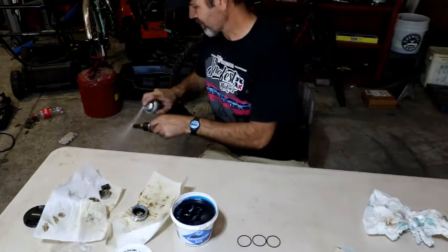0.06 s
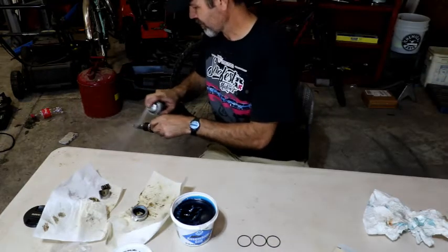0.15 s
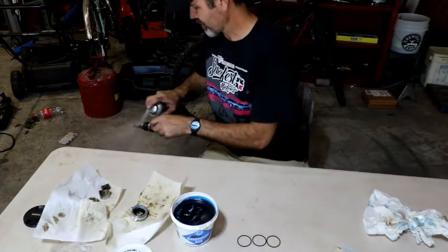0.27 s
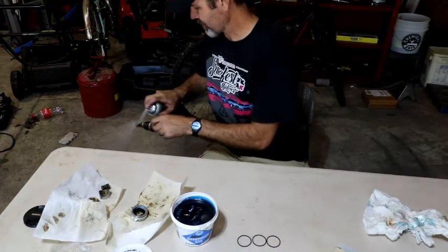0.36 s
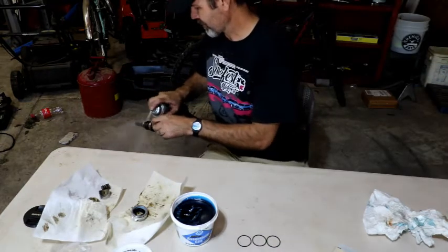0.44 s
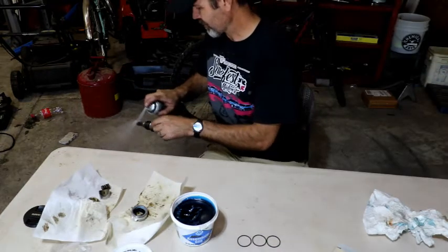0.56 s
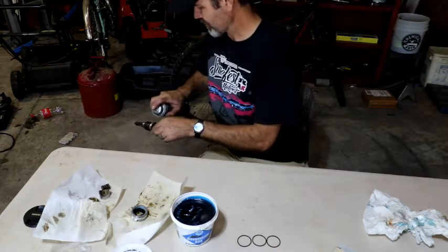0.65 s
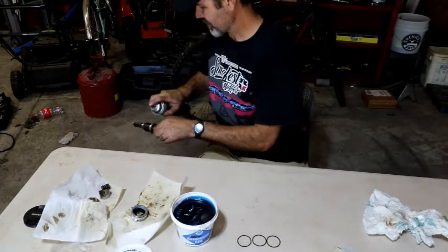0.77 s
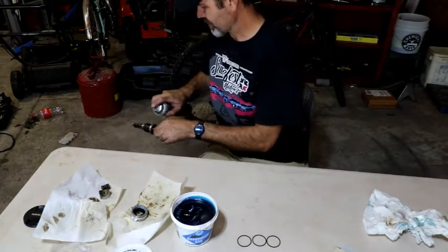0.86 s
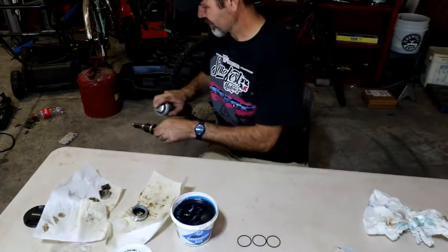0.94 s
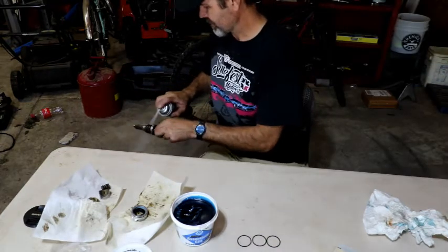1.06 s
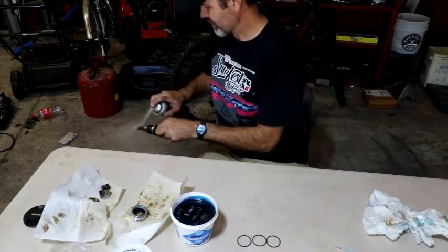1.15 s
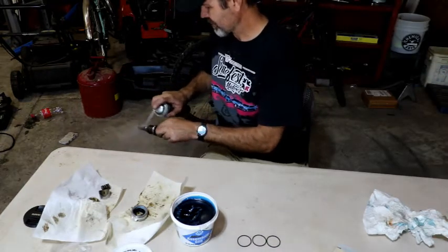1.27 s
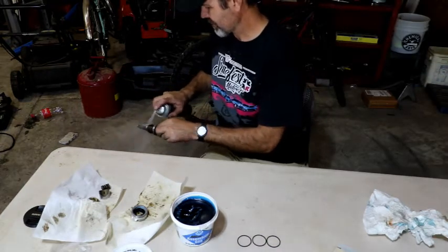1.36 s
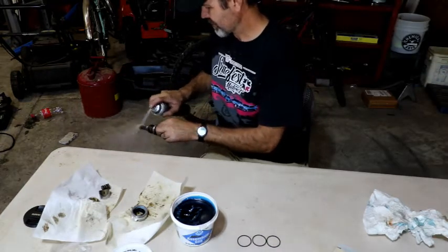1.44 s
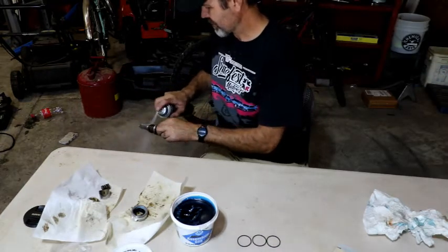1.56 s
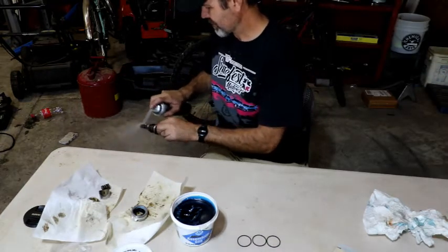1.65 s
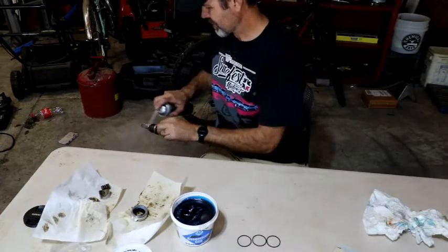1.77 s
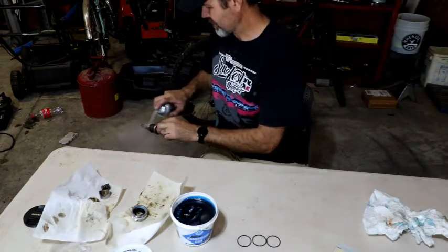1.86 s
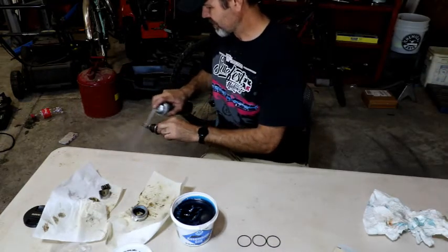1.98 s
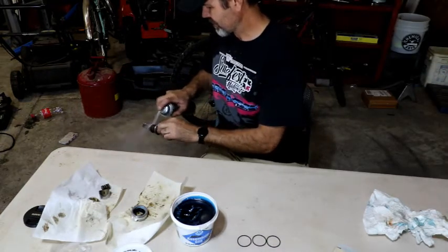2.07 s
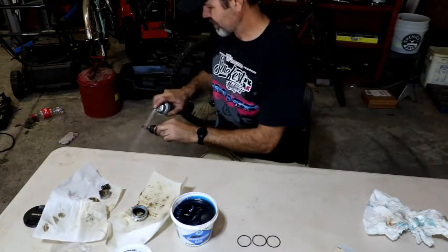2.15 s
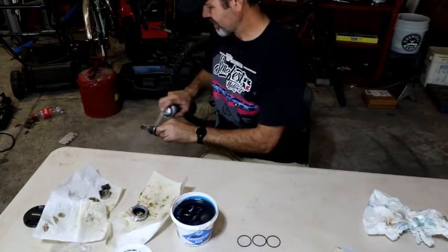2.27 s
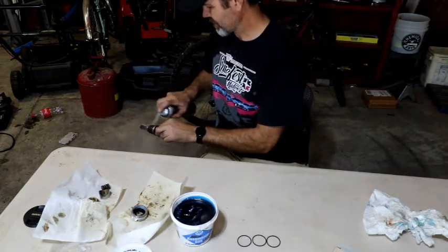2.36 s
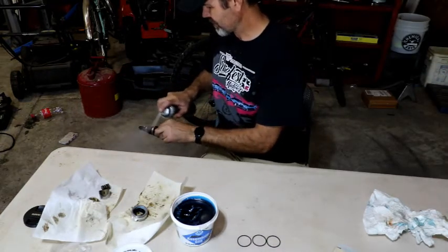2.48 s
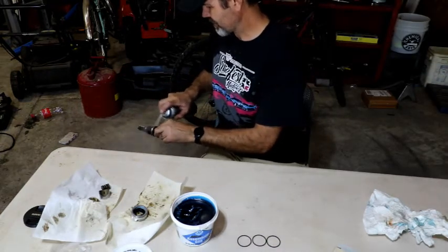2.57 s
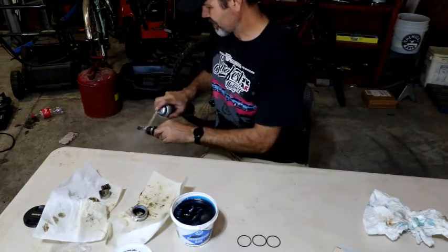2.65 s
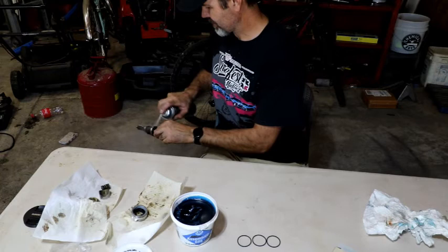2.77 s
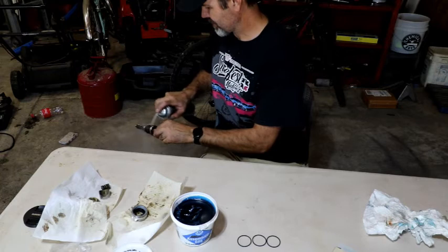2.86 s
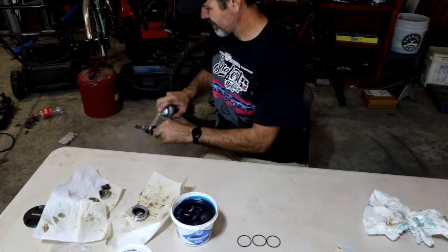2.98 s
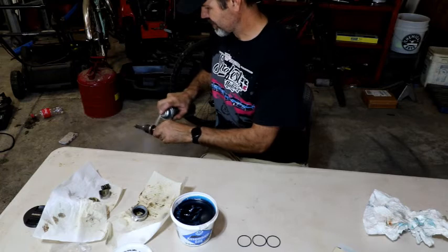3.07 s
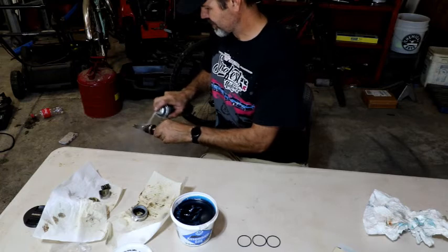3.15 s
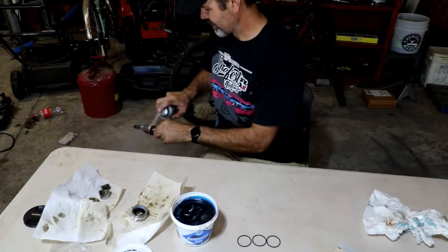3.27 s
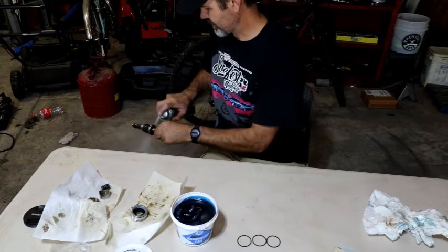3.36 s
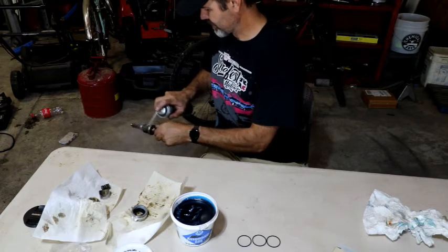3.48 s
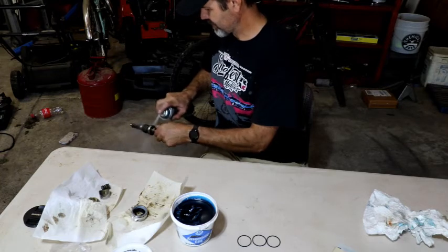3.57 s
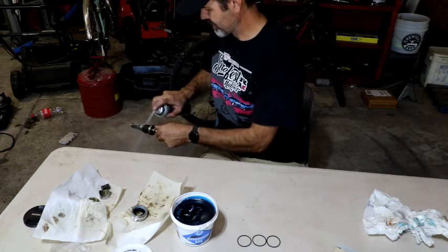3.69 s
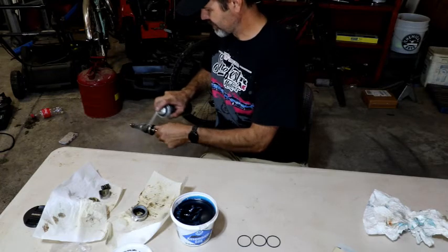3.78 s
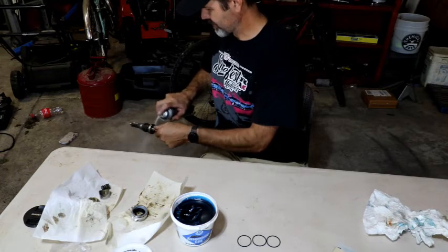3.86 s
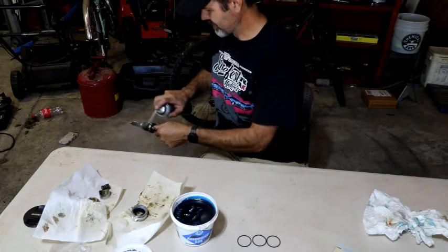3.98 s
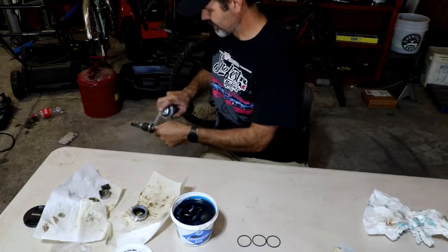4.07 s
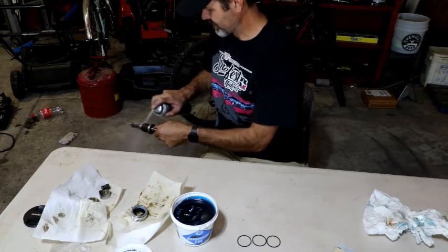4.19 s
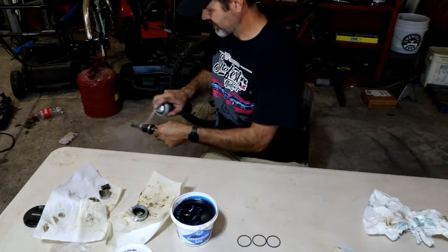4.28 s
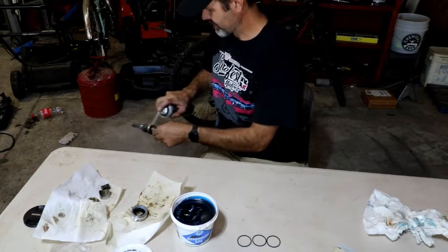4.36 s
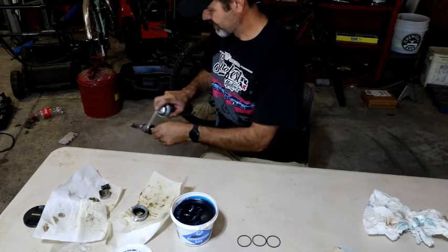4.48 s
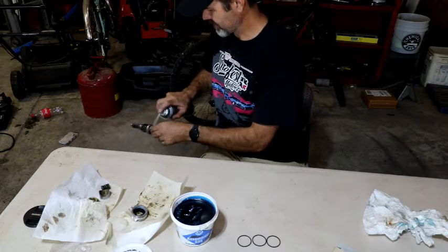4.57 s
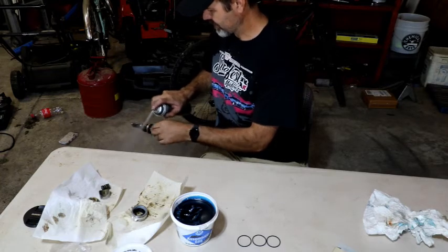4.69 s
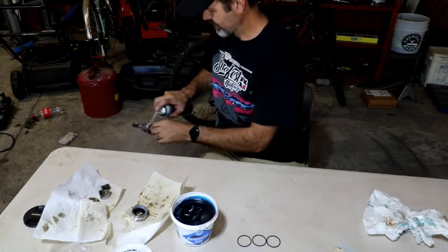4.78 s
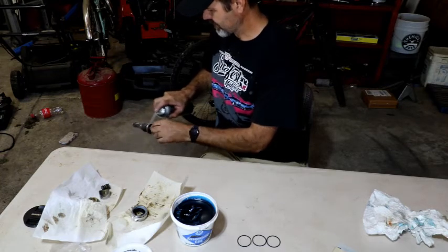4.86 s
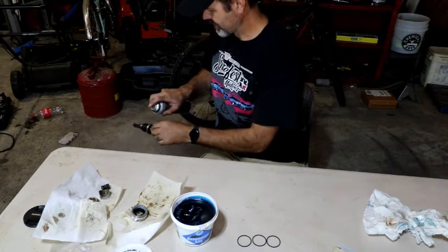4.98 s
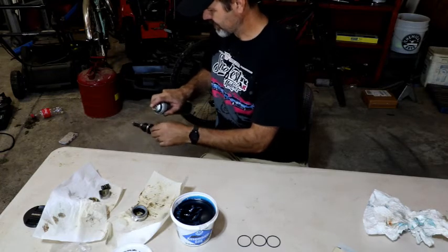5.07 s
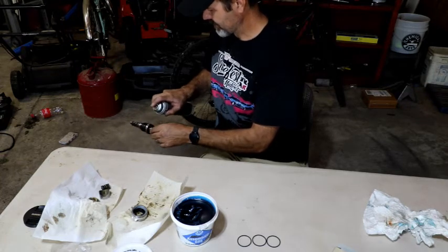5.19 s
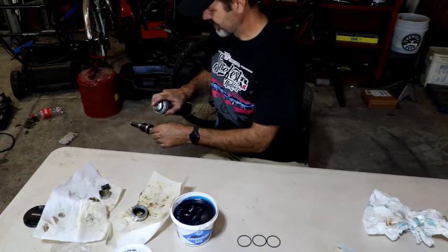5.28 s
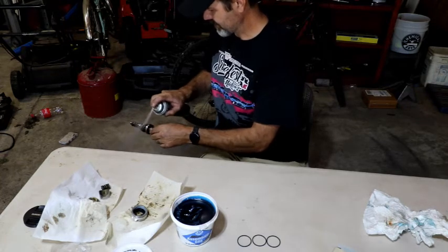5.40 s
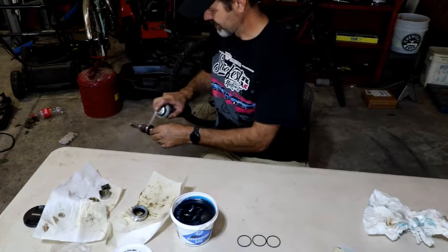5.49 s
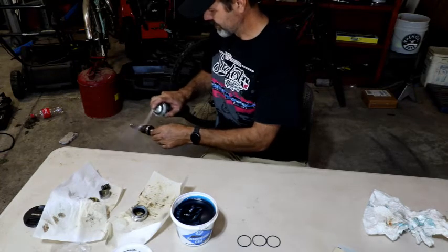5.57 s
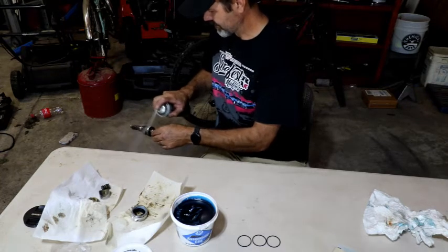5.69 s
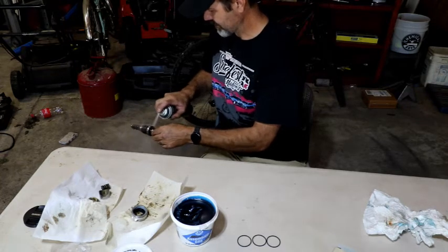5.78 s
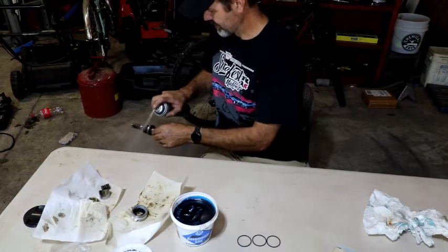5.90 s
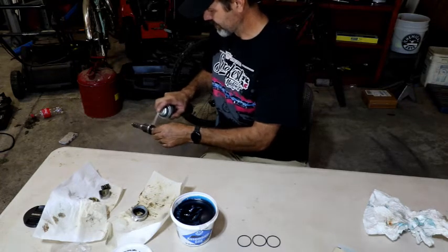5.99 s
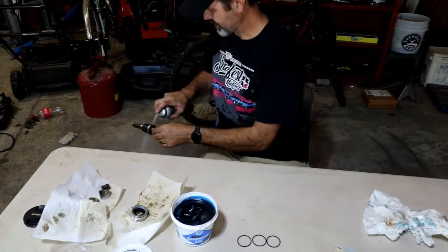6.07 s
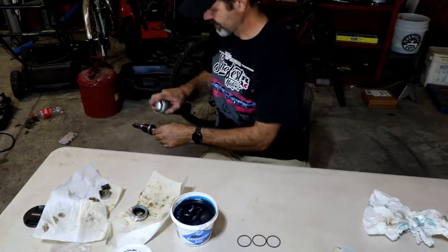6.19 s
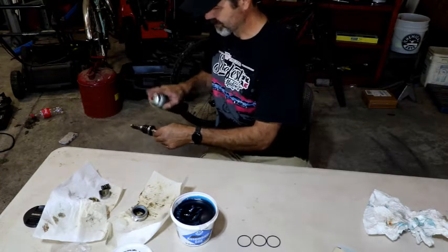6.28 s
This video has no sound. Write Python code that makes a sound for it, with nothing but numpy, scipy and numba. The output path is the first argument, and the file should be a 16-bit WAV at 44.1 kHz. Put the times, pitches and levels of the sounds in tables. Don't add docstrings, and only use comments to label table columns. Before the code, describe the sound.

An aerosol can sprays a hollow metal part about two metres from the microphone in a garage. The hiss is already running, stops sharply, returns for a long burst of about four seconds, pauses, then gives a short last burst. Bottle-like hollow whooshes and liquid gulps colour it, a drop fizzes in the second gap, and brief reverberation follows each stop over faint traffic rumble.

```python
import sys
import numpy as np
from scipy import signal
from scipy.fft import rfft, irfft
from scipy.io import wavfile
from scipy.ndimage import uniform_filter1d, map_coordinates
from numba import njit

SR = 44100
rng = np.random.default_rng(int(sys.argv[2]) if len(sys.argv) > 2 else 0)


def boost(x):
    u = np.asarray(x, float) / 20
    return 10 ** u


def file_out(sig):
    cols = np.atleast_2d(sig).T
    lim = np.clip(cols, -1, 1)
    pcm = np.round(lim * 32767).astype(np.int16)
    wavfile.write(sys.argv[1], SR, pcm)


N = 279546
T = np.arange(N) / SR
HZ = np.fft.rfftfreq(N, 1 / SR) + 1

# valve opens in [s], valve shuts in [s].
BURSTS = [
    (-.1, .7045),
    (1.093, 5.045),
    (5.452, 6.156),
]
# level on opening in [dB], on shutting in [dB].
SPITS = [
    (-24, -18.5),
    (-15, -22),
    (-15, -22),
]
OPEN_DB_PER_MS, SHUT_DB_PER_MS, SPIT_MS = 2, 2.5, 3.7
CRACK_MS = 11.6

# start in [s], aim from 0 at the flank to 1 at the open end,
# nozzle tube pitch in [Hz], finger pressure in [dB].
HAND = [(0, .3, 4400, 1), (.1, 0.21, 4310, 0.5), (.7, 0.094, 4270, -0.5), (1.1, .2, 4230, -0.5),
        (1.35, 0.061, 4230, 0), (1.7, .1, 4370, 0), (2.1, 0.15, 4410, 0), (2.45, 0.3, 4600, 0),
        (3.0, 0.26, 4600, -0.5), (3.35, 0.77, 4530, -0.5), (4.0, 1, 4460, 0), (4.6, 0.51, 4520, 0.5),
        (4.95, 0.67, 4460, 0), (5.05, .5, 4300, -1), (5.45, 0.99, 4450, 0), (5.8, .8, 4470, 0),
        (6.05, 0.9, 4550, 0), (6.16, .4, 4520, -1.5)]
# middle in [s], bore over jet in [dB], bore pitch in [Hz], length in [ms].
SWEEPS = [(.0, -6, 1700, 33), (.31, -6, 1230, 50), (.51, -2, 1580, 63), (.66, -3, 1390, 22),
          (1.40, -2.5, 1650, 40), (1.68, -8, 1150, 35), (1.89, -3, 1730, 49), (2.13, -3, 1660, 55),
          (2.41, -10, 1680, 35), (2.58, -4, 1600, 35), (2.78, -6, 1600, 69), (2.98, -1, 1500, 70),
          (3.25, 0.5, 1530, 35), (3.38, -4.5, 1570, 25), (3.55, -4, 1470, 40), (3.78, -1.5, 1400, 39),
          (4.15, 0, 1520, 37), (4.29, -0.5, 1360, 56), (4.62, 5.5, 1330, 36), (4.71, -1.5, 1380, 42),
          (4.9, -1, 1390, 66), (5.55, -5, 1220, 32), (5.65, 0.5, 1370, 32), (5.9, -7, 1420, 68),
          (6.07, -1, 1300, 16)]
SWEEP_DIP_DB, TREMOR_DB, TREMOR_RATE = 0, 0.57, 14
LIFT_MS = 70

# frequency in [Hz], density in [dB per Hz].
JET_COLOUR = [(1060, -10), (1900, -2.5), (2500, -4), (2950, -2), (3800, -3), (4460, -2), (5600, -2),
              (6200, -7.5), (7400, -3.5), (8650, -5), (10900, -6), (13600, -7.5), (14700, -17.5),
              (15800, -12)]
# frequency in [Hz], density in [dB per Hz].
SPLASH_COLOUR = [(90, -35), (200, -12.5), (320, -7), (530, -1), (900, -1), (1400, 0.5), (2200, -12.5),
                 (3200, -25), (6000, -80)]
# frequency in [Hz], density in [dB per Hz].
GAS_COLOUR = [(1500, -33), (3000, -12), (4600, -8), (6300, -15), (8700, 0), (10800, -2), (12800, 2),
              (14500, -15), (16000, -12)]
JET_DB, MIST_DB, SPLASH_DB, BORE_DB = -25, 1, -10.5, -11.5
AIM_MIST_DB, AIM_SPLASH_DB, AIM_BORE_DB = 0.2, -2.5, 2.5
MIST_FROM_HZ, BORE_WIDTH_HZ = 6680, 300

TUBE_WIDTHS_HZ = (470, 740)
TUBE_DB, AIM_TUBE_DB, TUBE_RATIO = (-5, -9), (-9, -2.5), 1.956

# middle in [s], pitch in [Hz], level in [dB], length in [ms].
GULPS = [(.41, 950, -35, 37), (1.35, 1020, -38, 57), (1.57, 720, -33.5, 28), (1.72, 1040, -32, 30),
         (1.81, 710, -36, 23), (2.07, 490, -39, 29), (2.07, 750, -34, 30), (2.30, 1510, -31, 17),
         (2.75, 483, -41, 29), (3.25, 1510, -31, 25), (3.40, 2300, -38, 25), (3.78, 1400, -30.5, 37),
         (3.93, 243, -40.5, 28), (4.15, 1560, -38, 30), (4.15, 2530, -34, 22), (4.29, 332, -46, 26),
         (4.87, 2400, -37, 25), (5.02, 606, -40.5, 20), (5.625, 1095, -35, 25), (5.725, 423, -35, 31),
         (5.745, 515, -32.5, 28), (5.99, 444, -36, 35), (5.99, 530, -37, 33)]
GULP_WIDTH_HZ, GULP_WIDTH_SHARE = 69, 0.047

# level in [dB], pitch in [Hz], attack in [ms],
# fade in [dB per s], rise in [Hz per s].
FIZZ = (-50, 6200, 2, 150, 7000)
FIZZ_S = 5.312
# start in [s], peak level in [dB].
POPS = [
    (1.080, -43),
    (5.228, -52),
    (5.249, -51),
    (5.313, -40),
    (5.396, -52),
]
# start in [s], pitch in [Hz], level in [dB], t60 in [s].
PART_RING = (6.152, 9300, -38, .22)

# frequency in [Hz], t60 in [s].
GARAGE_DECAY = [(200, 0.44), (500, 0.63), (1400, 0.41), (4000, 0.41), (9000, 0.35), (13500, 0.23),
                (16000, 0.24)]
TABLE_SHARE, GARAGE_DB = 0.14, -5.5
BEAMED_DB = -6

# frequency in [Hz], density in [dB per Hz].
RUMBLE_COLOUR = [(15, -31), (25, -8), (119, -1.5), (205, -5.5), (261, -8.5), (391, -13.5), (878, -15.5),
                 (1390, -21), (1720, -23), (4300, -27.5), (5790, -27), (8220, -27.5), (14000, -31),
                 (15700, -40)]
RUMBLE_DB = -52
# time in [s], level over the rumble in [dB].
TYRE_ROAR = [
    (0, -10),
    (1.0, -14),
    (4.2, -15),
    (5.3, -13),
    (6.34, -7),
]
# time in [s], low drone in [Hz], its level in [dB], high drone level in [dB].
ENGINE = [(0, 56.8, -66, -75), (1.3, 56.2, -67, -74), (2.0, 56.4, -60, -57), (2.4, 57, -68, -66),
          (3.05, 61, -66, -55.5), (3.4, 59.9, -63, -58), (3.9, 61, -70, -72), (4.5, 64.8, -57, -51),
          (4.9, 68, -52, -56), (5.3, 69.7, -51, -58), (5.7, 68.2, -55, -53), (5.85, 66, -58, -54),
          (5.95, 55, -58, -53), (6.34, 50, -64, -64)]
ENGINE_RATIO = 1.55

# frequency in [Hz], density in [dB per Hz].
HISS_COLOUR = [(40, 3), (300, 2.5), (1500, 0.5), (5000, 1.5), (12000, -1), (16000, -1.5)]
HISS_DB = -59.5
# middle in [s], low edge in [Hz], high edge in [Hz],
# level in [dB].
FLASHES = [(.395, 10300, 11900, -38), (1.118, 5700, 7000, -35), (1.118, 7600, 9100, -32),
           (1.975, 10300, 11900, -38), (2.275, 5200, 6400, -35), (2.762, 13100, 14600, -40),
           (4.668, 11000, 12500, -35), (6.012, 11000, 13200, -35), (6.083, 6200, 7700, -36)]


def level(x, db):
    return x * boost(db) / np.sqrt(np.mean(x ** 2))


def noise(colour):
    hz, db = np.transpose(colour)
    return rfft(rng.standard_normal(N)) * boost(np.interp(np.log(HZ), np.log(hz), db, left=-90))


def walk(rate):
    hold = int(SR / rate)
    steps = np.repeat(rng.standard_normal(N // hold + 1), hold)
    return 1.3 * uniform_filter1d(uniform_filter1d(steps, hold), hold)[:N]


def patchy(spectrum, edges_hz, own_db, rate):
    out = 0
    for k in range(len(edges_hz)):
        share = np.interp(HZ, edges_hz, np.arange(len(edges_hz)) == k)
        out = out + irfft(spectrum * share, N) * boost(own_db * walk(rate))
    return out


@njit
def svf(x, hz, width):
    y, band, low = np.empty(len(x)), 0., 0.
    for i in range(len(x)):
        g, k = np.tan(np.pi * hz[i] / SR), width / hz[i]
        v = (band + g * (x[i] - low)) / (1 + g * (g + k))
        band, low, y[i] = 2 * v - band, low + 2 * g * v, k * v
    return y


def resonance(air, hz, width):
    return svf(svf(air, hz, 2. * width), hz, 1. * width)


def bump(at, ms):
    return np.exp(-((T - at) * 1000 / ms) ** 2)


def spray():
    share, _, press_db = hand()
    swept, bore_hz = sweeps()
    shake = boost(SWEEP_DIP_DB * np.sqrt(swept) + TREMOR_DB * walk(TREMOR_RATE))
    hiss = noise(JET_COLOUR)
    fine = 1 / (1 + (MIST_FROM_HZ / HZ) ** 12)
    droplets = boost(0.57 * walk(400) + 0.35 * walk(40))
    flow, spit = valve()
    force = droplets * boost(JET_DB + press_db - 0.95) * flow
    gas = level(irfft(noise(GAS_COLOUR), N), 0) * boost(1.3 * walk(900))
    wide = (jet(hiss * (1 - fine)) * shake + mist(hiss * fine, share) + splash(share)) * force + gas * spit
    beamed = (tube() * shake + bore(share, swept, bore_hz)) * force
    return wide, beamed


def valve():
    flow, spit = 0, 0
    for (opens, shuts), (first_db, last_db) in zip(BURSTS, SPITS):
        early, late = 1000 * (opens - T), 1000 * (T - shuts)
        unseated = np.clip(CRACK_MS - early, 0, 1)
        opening_db = -OPEN_DB_PER_MS * np.clip(early, 0, 60)
        flow = flow + unseated * boost(opening_db - SHUT_DB_PER_MS * np.clip(late, 0, 60))
        fade = np.exp(-(np.clip(-early, 0, 99) / SPIT_MS / 2) ** 2)
        spit = spit + unseated * boost(first_db + opening_db) * fade
        spit = spit + boost(last_db) * np.exp(-((late + 2.5) / SPIT_MS) ** 2)
    return flow, spit


def hand():
    s, *controls = np.transpose(HAND)
    return [np.interp(T, s, c) for c in controls]


def sweeps():
    power = sum(boost(db) ** 2 * bump(at, ms) for at, db, _, ms in SWEEPS)
    s, _, hz, _ = np.transpose(SWEEPS)
    return power, np.interp(T, s, hz)


def spray_bands():
    return np.linspace(1500, 16000, num=40)


def jet(coarse):
    return level(patchy(coarse, spray_bands()[:17], 1.32, 18), -0.25)


def mist(fine, share):
    out = level(patchy(fine, spray_bands()[8:], 2.36, 18), -0.11)
    return out * boost(MIST_DB + AIM_MIST_DB * share + 0.29 * walk(TREMOR_RATE))


def splash(share):
    out = level(patchy(noise(SPLASH_COLOUR), np.geomspace(100, 3200, num=9), 0.97, 11), 3.02)
    return out * boost(SPLASH_DB + AIM_SPLASH_DB * share + 1.3 * walk(TREMOR_RATE))


def tube():
    share, first_hz, _ = hand()
    out = 0
    for ratio, db, turn_db, width in zip((1, TUBE_RATIO), TUBE_DB, AIM_TUBE_DB, TUBE_WIDTHS_HZ):
        hz = ratio * first_hz * (1 + 0.0078 * walk(12))
        ring = resonance(rng.standard_normal(N), hz, width)
        out = out + level(ring, 0) * boost(db + turn_db * share + 1.1 * walk(20.65))
    return out


def bore(share, swept, hz):
    lift = np.prod([np.clip(np.abs(T - shuts) * 1000 / LIFT_MS, 0, 1) for _, shuts in BURSTS], axis=0)
    steady = lift * boost(BORE_DB + AIM_BORE_DB * share)
    ring = resonance(rng.standard_normal(N), hz, BORE_WIDTH_HZ)
    return level(ring, -3.5) * np.sqrt(steady ** 2 + swept)


def gulps():
    air, out = rng.standard_normal(N), 0
    for at, hz, db, ms in GULPS:
        ring = resonance(air, np.full(N, 1. * hz), GULP_WIDTH_HZ + GULP_WIDTH_SHARE * hz)
        out = out + level(ring, db) * bump(at, ms)
    return out


def leftovers():
    db, start_hz, attack_ms, fade_db, rise_hz = FIZZ
    air = rng.standard_normal(N)
    hz = start_hz + rise_hz * np.clip(T - FIZZ_S, 0, .14)
    fizz = level(svf(svf(air, hz, 2300.), hz, 1500.), 0)
    fizz = fizz + level(svf(air, 1.36 * hz, 2200.), 0) + level(svf(air, 2.2 * hz, 4500.), -9)
    attack = np.clip(1 + (T - FIZZ_S) * 1000 / attack_ms, 0, 1)
    out = fizz * attack * boost(db - fade_db * np.clip(T - FIZZ_S, 0, 1))
    for at, peak_db in POPS:
        out = out + boost(peak_db) * svf(air, hz, 6000.) * np.exp(-np.abs(T - at) / 0.00049)
    at, ring_hz, ring_db, t60 = PART_RING
    ring = level(svf(air, np.full(N, 1. * ring_hz), 70.), 0)
    return out + (T > at) * boost(ring_db - 60 * np.abs(T - at) / t60) * ring


def table(x):
    source = np.arange(N) - SR / hand()[1]
    return TABLE_SHARE * map_coordinates(x, [source], order=3, mode="nearest")


def garage(x):
    hz, t60 = np.transpose(GARAGE_DECAY)
    t, out = T[:SR // 2], 0
    turn = 2 * np.pi * 0.594 * T + 0.96 * walk(2.996)
    for weight in (np.cos(turn), np.sin(turn)):
        white, tail = rfft(rng.standard_normal(N)), 0
        for k in range(len(hz)):
            share = np.interp(np.log(HZ), np.log(hz), np.arange(len(hz)) == k)
            fade = boost(-60 * t / t60[k]) * np.clip((t - .003) / 0.0087, 0, 1)
            tail = tail + irfft(white * share, N)[:len(t)] * fade / np.sqrt(np.sum(fade ** 2))
        out = out + boost(GARAGE_DB) * signal.fftconvolve(x * weight, tail)[:N]
    return out


def traffic():
    rumble = level(patchy(noise(RUMBLE_COLOUR), np.geomspace(25, 16000, num=10), 1.7, 3.02), RUMBLE_DB)
    return rumble + svf(rumble, np.full(N, 700.), 1400.) * boost(np.interp(T, *np.transpose(TYRE_ROAR)))


def engine():
    s, low_hz, low_db, high_db = np.transpose(ENGINE)
    out = 0
    for hz, db in ((low_hz, low_db), (ENGINE_RATIO * low_hz, high_db)):
        phase = 2 * np.pi * np.cumsum(np.interp(T, s, hz) * (1 + 0.0081 * walk(5.94))) / SR
        out = out + boost(np.interp(T, s, db) + 1.0 + 1.3 * walk(8.7)) * np.sin(phase)
    return out


def flashes():
    white, out = rfft(rng.standard_normal(N)), 0
    for at, low_hz, high_hz, db in FLASHES:
        window = np.cos(np.pi * np.clip((T - at) * SR / 2048, -.5, .5))
        out = out + level(irfft(white * (HZ > low_hz) * (HZ < high_hz), N), db) * window
    return out


def scene():
    wide, beamed = spray()
    wide = wide + gulps() + leftovers()
    near = wide + beamed
    echoes = table(near) + garage(wide + boost(BEAMED_DB) * beamed)
    return np.tile(near + echoes + traffic() + engine(), (2, 1))


def band_limit(x):
    return signal.sosfilt(signal.butter(12, 17060, fs=SR, output="sos"), x)


def record(dry):
    hiss = np.array([level(irfft(noise(HISS_COLOUR), N), HISS_DB) for _ in range(2)])
    capsule = np.tanh(1.114 * dry) / 1.084
    mix = capsule + hiss + flashes() * np.array([[1], [-1]])
    return band_limit(mix)


dry = scene()
out = record(dry)
file_out(out)
```